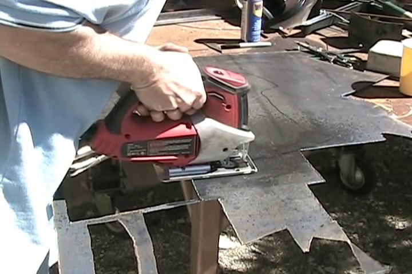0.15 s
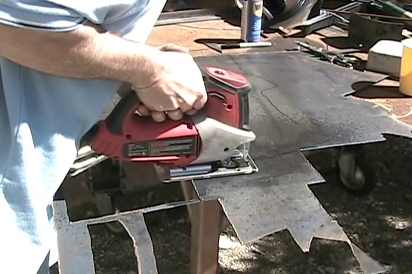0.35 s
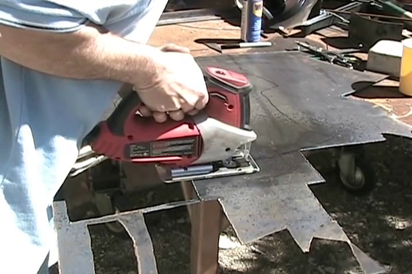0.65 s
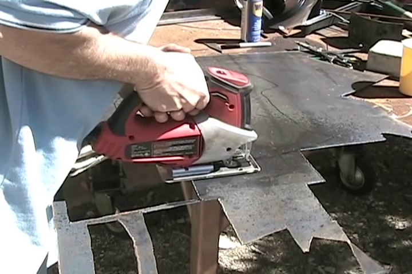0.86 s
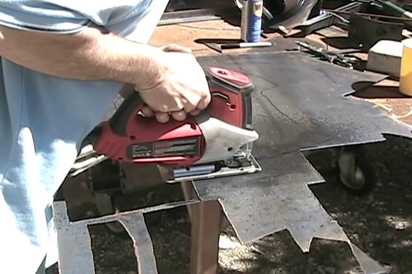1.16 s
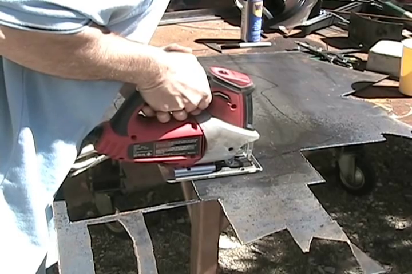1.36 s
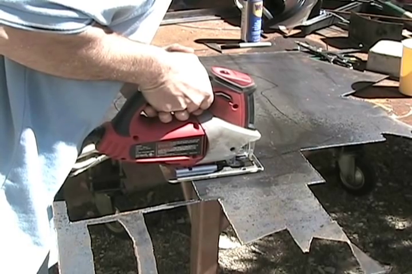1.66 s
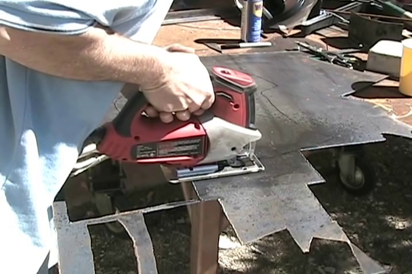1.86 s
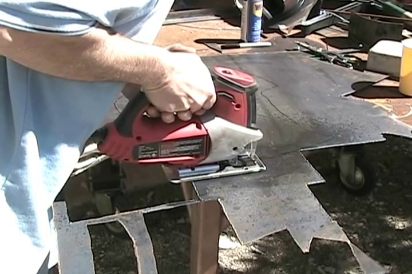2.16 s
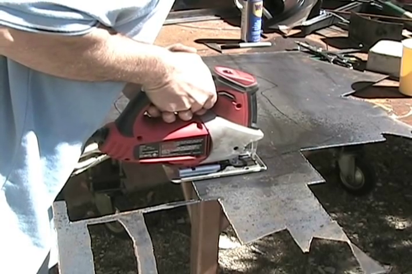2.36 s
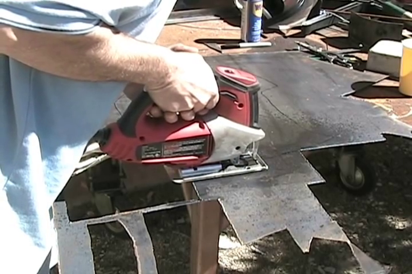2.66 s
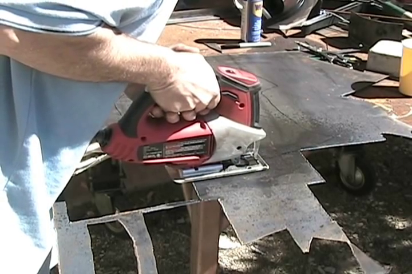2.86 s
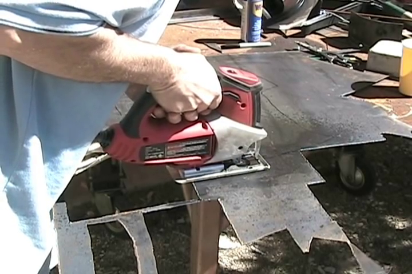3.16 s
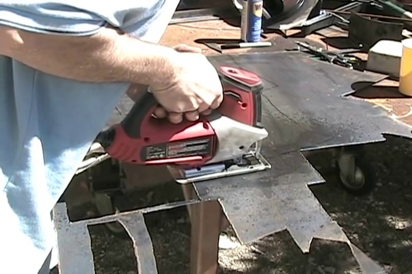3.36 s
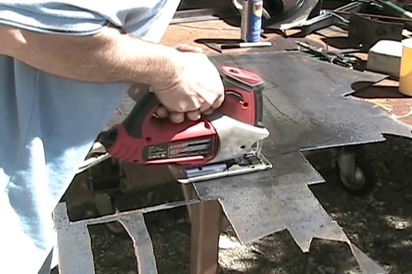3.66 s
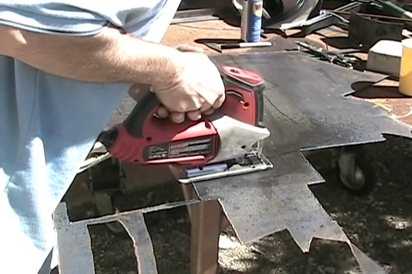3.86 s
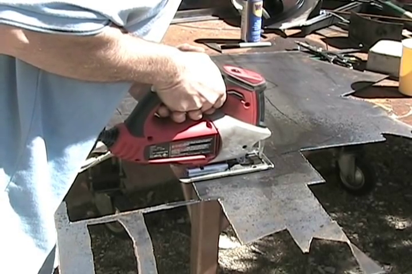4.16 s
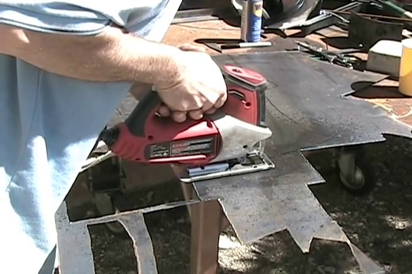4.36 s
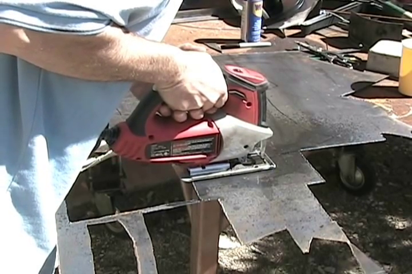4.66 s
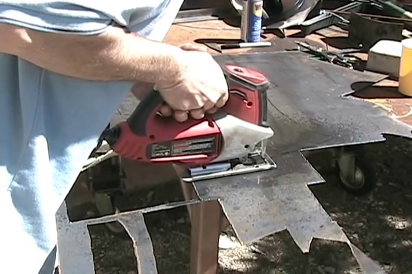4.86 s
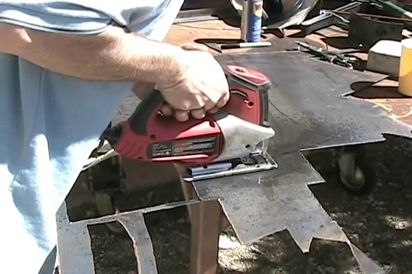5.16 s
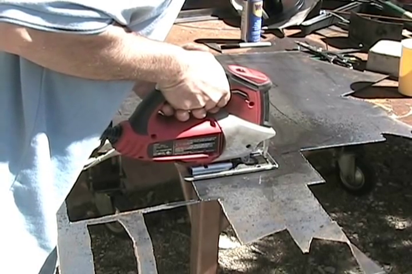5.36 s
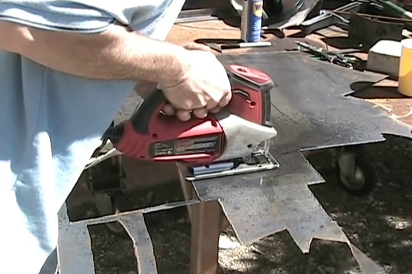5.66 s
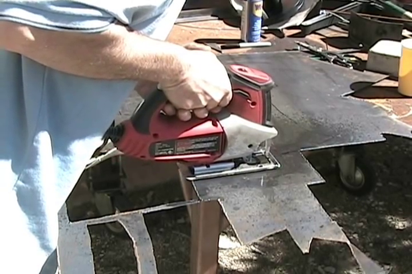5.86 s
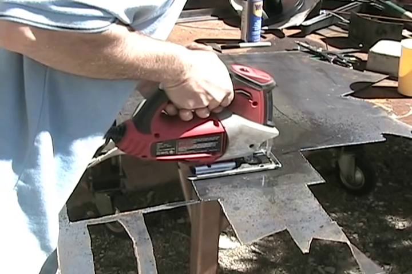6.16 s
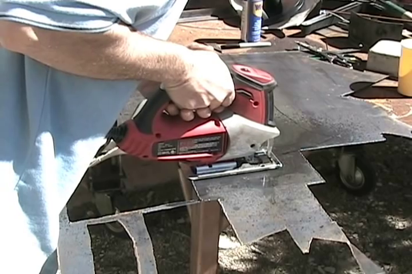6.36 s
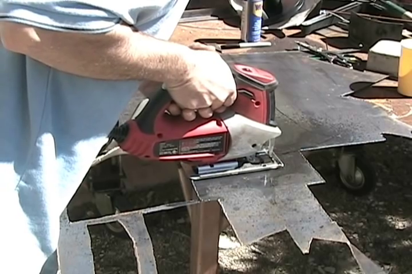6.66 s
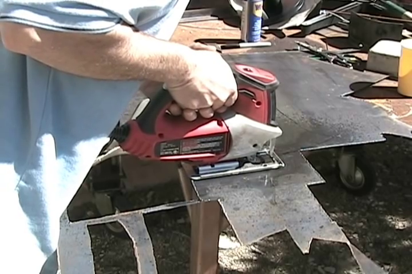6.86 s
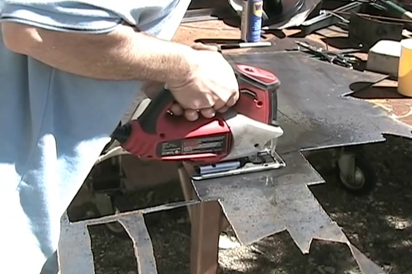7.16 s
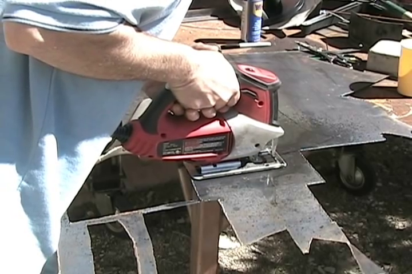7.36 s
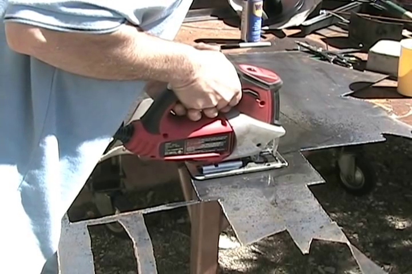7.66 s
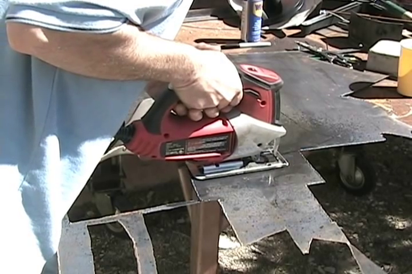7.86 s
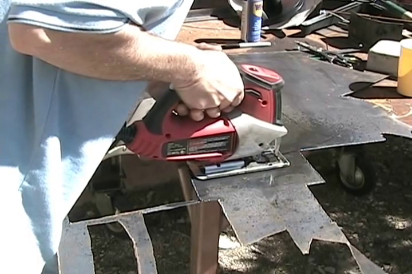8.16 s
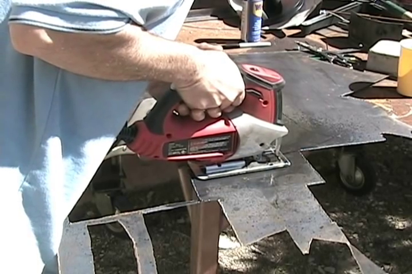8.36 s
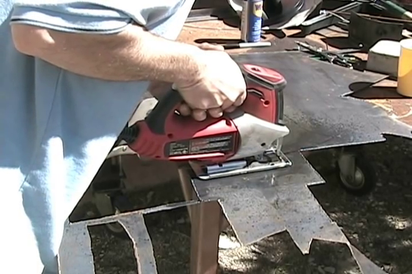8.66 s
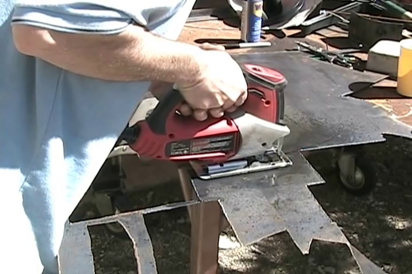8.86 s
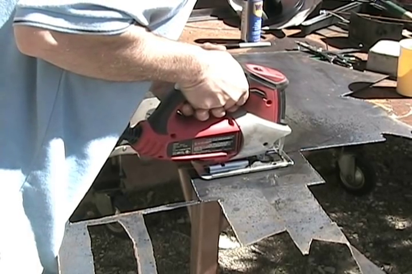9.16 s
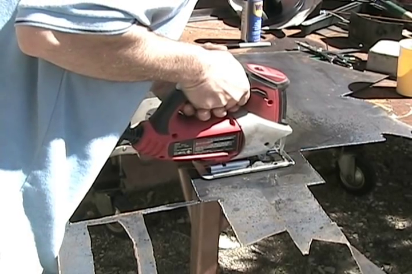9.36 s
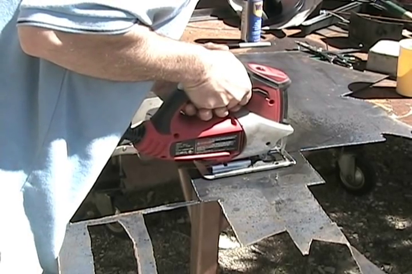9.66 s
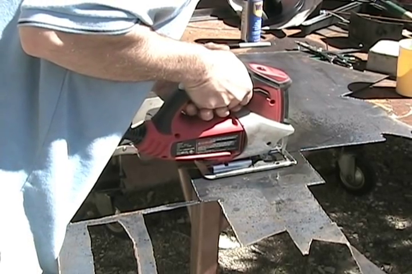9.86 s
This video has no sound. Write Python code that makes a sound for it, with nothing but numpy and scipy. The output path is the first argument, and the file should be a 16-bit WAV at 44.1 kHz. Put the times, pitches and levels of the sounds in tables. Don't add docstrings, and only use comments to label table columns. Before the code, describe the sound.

An electric jigsaw is already cutting thin sheet steel and never stops. Its teeth rasp in a rapid, roughly thirty-five-per-second flutter while the shoe rattles on the ringing sheet. A weak hum and low rumble lie underneath, with small irregular knocks where the blade grabs. Close, dry sound from a stereo camera microphone a metre or two away, mostly centred, its highest treble cut off.

```python
import sys
import numpy as np
from scipy import signal
from scipy.fft import rfft, irfft
from scipy.io import wavfile
from scipy.ndimage import uniform_filter1d

SR = 44100
rng = np.random.default_rng(int(sys.argv[2]) if len(sys.argv) > 2 else 0)


def voltage_ratio(level):
    return 10 ** (np.asarray(level, float) / 20)


def output_pcm(signal):
    pcm = np.clip(np.atleast_2d(signal).T, -1, 1) * 32767
    wavfile.write(sys.argv[1], SR, np.round(pcm).astype(np.int16))


N = 441000
T = np.arange(N) / SR
HZ = np.maximum(np.fft.rfftfreq(N, 1 / SR), 1)
SLOW = np.arange(N // 100 + 1) * 100 / SR


def unit(x):
    return x / np.sqrt(np.mean(x ** 2))


def shape(x, gain):
    return irfft(rfft(x) * gain, N)


def colour(points):
    hz, db = np.transpose(points)
    return voltage_ratio(np.interp(np.log(HZ), np.log(hz), db))


def under(hz, order=6):
    return 1 / np.sqrt(1 + (HZ / hz) ** (2 * order))


def gain_curve(db):
    return np.interp(T, SLOW, voltage_ratio(db))


def walk(rate):
    hold = int(SR / 100 / rate)
    held = np.repeat(rng.standard_normal(len(SLOW) // hold + 1), hold)
    slewed = uniform_filter1d(uniform_filter1d(held, hold), hold)
    return unit(slewed[:len(SLOW)])


def bell(t, at_s, length_s):
    return np.exp(-((t - at_s) / length_s) ** 2)


def burst(strokes, at, rise, fall, spread_db):
    turn = strokes - at + 2
    since = turn % 1
    stroke_db = spread_db * 2 * np.tanh(rng.standard_normal(size=400) / 2)
    strength = voltage_ratio(stroke_db)[turn.astype(int)]
    return strength * (1 - np.exp(-since / rise)) * np.exp(-since / fall)


def marks(bite_s, gain):
    out = np.zeros(N)
    out[np.clip((bite_s * SR).astype(int), 0, N - 1)] = gain
    return out


def grit(spread_db):
    clicks = rng.standard_normal((2, N))
    return unit(clicks * voltage_ratio(spread_db * rng.standard_normal((2, N))))


def clatter(strokes, count=12):
    length = SR // 35
    patterns = rng.standard_normal((count + 1, length))
    wobbly = strokes + 0.004 * np.interp(T, SLOW, walk(8))
    place = (wobbly % 1 * (length - 1)).astype(int)
    stage = T * count / (N / SR)
    old, blend = stage.astype(int), stage % 1 * np.pi / 2
    return np.cos(blend) * patterns[old, place] + np.sin(blend) * patterns[old + 1, place]


# (time [s], strokes done [count])
STROKE_COUNT = [(0.0, 0.09), (0.8, 26.9), (2.0, 67.76), (2.4, 81.46), (2.8, 95.29), (3.6, 122.82),
                (4.0, 136.48), (4.4, 150.37), (6.0, 206.23), (7.2, 248.19), (8.0, 276.28), (9.2, 318.69),
                (10.0, 346.7)]
# (time [s], thump level [dB])
GRABS = [(0.236, -33), (0.356, -41), (0.601, -40), (2.474, -41), (2.878, -39), (3.431, -36), (3.576, -43),
         (3.723, -39), (4.132, -31), (4.446, -40), (4.53, -41), (4.776, -38), (4.967, -34), (5.105, -29),
         (5.217, -39), (5.363, -38), (5.566, -38), (5.621, -33), (5.764, -35), (5.966, -34), (6.165, -35),
         (6.225, -35), (6.337, -36), (6.794, -36), (7.11, -32.5), (7.256, -36), (7.764, -37), (8.457, -39),
         (9.311, -37), (9.383, -37)]


def hard_bites():
    usual_db, spread_db, jitter_s = -49, 3, 0.002
    bind_s, bind_length_s, bind_db = 5.9, 1, 5
    grab_fade_db = 8
    felt_db = -47.5
    s, done = np.transpose(STROKE_COUNT)
    count = int(done[-1])
    chance = rng.standard_normal((count, 2)).T
    bite_s = np.interp(np.arange(count) + 1, done, s) + jitter_s * chance[0]
    bite_db = usual_db + bind_db * bell(bite_s, bind_s, bind_length_s) + spread_db * np.tanh(chance[1])
    for grab_s, grab_db in GRABS:
        k = np.argmin(abs(bite_s - grab_s))
        bite_s[k], bite_db[k] = grab_s, grab_db
        fading_db = grab_db - grab_fade_db * np.arange(1, len(bite_db) - k)
        bite_db[k + 1:] = np.maximum(bite_db[k + 1:], fading_db)
    felt = bite_db > felt_db
    sign = np.sign(chance[0] * chance[1])
    return bite_s[felt], bite_db[felt], sign[felt]


# (frequency [Hz], level [dB])
RASP_COLOUR = [(2600, -3), (4500, -1), (5900, 4), (7000, 3), (12000, 3.5)]


def scrape(strokes, bites):
    bite_s, bite_db, _ = bites
    tail = np.exp(-np.arange(SR // 20) / (0.007 * SR))
    crack = signal.fftconvolve(marks(bite_s, voltage_ratio(0.43 * (bite_db + 47))), tail)[:N]
    crack = np.roll(crack, -int(0.0026 * SR))
    up_stroke = 1.12 * burst(strokes, -0.11, 0.037, 0.23, 2.7)
    down_stroke = 0.3 * burst(strokes, 0.3, 0.05, 0.14, 3.0)
    force = up_stroke + down_stroke + 0.5 * crack
    rasp = shape(grit(1.5) * force * gain_curve(2.0 * np.tanh(walk(12))), colour(RASP_COLOUR))
    chatter = (grit(1.3) + 0.35 * clatter(strokes)) * gain_curve(0.61 * walk(14))
    airy = shape(chatter, 1 - under(6900.0))
    return chatter + airy * (gain_curve(1.06 * walk(10)) - 1) + rasp


def sheet(strokes):
    rattle = grit(0.87) + 0.59 * clatter(strokes)
    knock = 1 + 1.1 * burst(strokes, 0.26, 0.12, 0.15, 2.1) + 0.36 * burst(strokes, 0.79, 0.044, 0.08, 2.5)
    teeth = 1 + 0.4 * burst(strokes, -0.11, 0.1, 0.3, 2.5)
    dull = under(1850)
    knocked = shape(rattle * knock / np.mean(knock), dull)
    return knocked + shape(rattle * teeth / np.mean(teeth), 1 - dull)


# (frequency [Hz], width [Hz], then lift [dB] in
SHEET_MODES = [(377, 21, 1.5, 3, 0, 3), (409, 12, 4, -0.5, 5.5, 2.5), (445, 25, 0.5, 2.5, 2, 2),
               (634, 20, 1, 2.5, 2, 3), (768, 15, -1, 0.5, -3, 2), (801, 34, 4.5, 2, 3, 2),
               (832.6, 10, 3.5, 6, 5, 5), (1030.4, 45, 3.5, 3, 4.5, 3), (1065, 25, 2, 4, 1, 3),
               (1200, 23, 4, -4.5, -2.5, 6), (1253, 11, 4.5, 5.5, 5.5, 4), (1290, 20, 0.5, -0.5, 4, 2.5),
               (1363, 41, 1.5, 2.5, 2.5, 3.5), (1463, 25, -1, 4.5, 0.5, 3),
               (1531, 46, -0.5, 2.5, 4, 4.5), (1601, 12, 3, 3, -1, -1), (1690, 53, 0, 2.5, 0, -1),
              (1843, 10, 6, 4, 1.5, 2.5), (1954, 41, 2, 1.5, 0.5, -2), (2205, 32, 5, 2, 1.5, 2.5),
              (2317, 51, 3.5, 4.5, 1, 1), (2510, 93, 2.5, 3, 1.5, 3), (2850, 71, -1, 0.5, 1, 2.5),
              (3130, 62, 2.5, 3, 2, 3), (3950, 83, 2, -0.5, -1, 0.5), (5370, 77, 1, -2, -5, 0.5),
              (5870, 54, 0, 1.5, 2, 0.5)]
QUARTER_TIMES = [1.25, 3.75, 6.25, 8.75]


def ring(x):
    out = x.copy()
    for hz, width, *lift_db in SHEET_MODES:
        b, a = signal.iirpeak(hz, hz / width, SR)
        lift = gain_curve(1.69 * np.interp(SLOW, QUARTER_TIMES, lift_db) + 0.7 * walk(6)) - 1
        out += lift * signal.lfilter(b, a, x)
    return out


def thumps(bites):
    bite_s, bite_db, sign = bites
    hard = marks(bite_s, voltage_ratio(bite_db + 5.0) * sign)
    faint = voltage_ratio(-48.5) * rng.standard_normal(N) * (rng.random(N) < 150 / SR)
    decay = np.exp(-np.arange(SR // 20) / (0.0047 * SR))
    tail = signal.fftconvolve(abs(hard), decay)[:N]
    rough = 0.096 * tail * rng.standard_normal(N)
    push = signal.fftconvolve(hard + faint + rough, np.hanning(int(0.0017 * SR)), "same")
    return shape(push, np.sqrt(1 - under(45, order=1) ** 2))


# (multiple of the stroke rate, then level [dB] at each stage of the cut)
CRANK_HUM = [(3, -90, -74, -72, -69), (4, -74.5, -70.5, -68.5, -68), (5, -92, -70, -73, -69),
             (6, -72, -64, -63.5, -66.5), (7, -68, -65, -73, -65.5), (8, -69.5, -57, -61, -61),
             (9, -78, -77, -67, -68), (10, -66.5, -70, -72, -83), (11, -63, -63, -68, -57),
             (12, -69, -60, -82, -68), (13, -78, -67, -55.5, -64), (14, -69, -61.5, -66, -66),
             (18, -73, -74, -65, -60.5), (19, -73, -74, -64, -56)]
HUM_STAGES = [2.5, 3.1, 6.25, 8.75]


def crank(strokes):
    hum = 0
    for multiple, *stage_db in CRANK_HUM:
        gain = gain_curve(np.interp(SLOW, HUM_STAGES, stage_db) + 1.1 * walk(4))
        turns = int(round(multiple)) * strokes + rng.random()
        hum = hum + gain * np.sqrt(2) * np.sin(2 * np.pi * turns)
    return hum


def rumble(strokes):
    shake = 1 + 0.41 * burst(strokes, 0.086, 0.055, 0.3, 2.5)
    return (grit(1.0) + 0.2 * clatter(strokes)) * shake


# (time [s], feed [dB], length [s])
HAND_FEED = [(0.53, 1, .08), (0.664, -3.5, .025), (0.717, 2.5, .03), (0.8, -1.5, .04), (1.15, 2.5, 0.029),
             (1.22, -2, .06), (1.427, 1, 0.038), (1.95, -1, 0.14), (2.17, 0.5, 0.045), (2.664, -2, .04),
             (3.155, -3.5, 0.044), (3.25, 1.5, .05), (3.395, -3.5, .03), (3.43, 2.5, .04),
             (4.083, -1.5, .06), (4.264, -2, 0.024), (4.477, -1.5, .04), (4.537, 1.5, .03),
             (4.62, -2, 0.034), (5.39, 1, .03), (5.967, 2, 0.025), (6.034, -2.5, 0.061), (6.203, 2, 0.043),
             (6.3, -1, 0.044), (6.91, -2, 0.07), (7.137, 3, 0.025), (8.225, 2.5, .04), (9.17, -2.5, 0.028),
             (9.378, 2, 0.068), (9.44, -2, 0.043)]


def levels():
    feed_db = sum(db * bell(SLOW, s, length) for s, db, length in HAND_FEED)
    sheet_db = -30.5 + 0.078 * SLOW + feed_db + 0.38 * walk(10)
    scrape_db = -29 - 0.11 * SLOW + 0.51 * feed_db + 0.07 * walk(10)
    rumble_db = -51 + 0.28 * SLOW + 2 * walk(16)
    return sheet_db, scrape_db, rumble_db


def patchy(side, patchy_db=3.5):
    out, common, below = 0, walk(11), 0
    for hz in [900, 1200, 1600, 2100, 2800, 3600, 4600, 5800]:
        upto = (HZ < hz) * 1.0
        swing = 0 if hz == 900 else patchy_db
        out = out + gain_curve(swing * (0.67 * common + 0.63 * walk(12))) * shape(side, upto - below)
        below = upto
    return out + shape(side, 1 - below)


# (frequency [Hz], level [dB])
BODY_COLOUR = [(25, -58), (60, -47), (200, -28), (310, -22), (385, -18.5), (580, -15.5), (800, -10),
               (910, -12), (1040, -3), (1300, -3.5), (1700, -5.5), (2000, -6), (2400, -6.5), (2700, -8)]
# (frequency [Hz], level [dB])
SCRAPE_COLOUR = [(2400, -8), (2750, -9.5), (3400, -9.5), (4300, -9), (5000, -11), (5800, -9.5),
                 (6400, -12.5), (7000, -16.5), (7800, -21.5), (8800, -17.5), (10000, -21.5), (10800, -27.5),
                 (12500, -34.5), (13600, -42), (14300, -53)]
# (frequency [Hz], level [dB])
STEREO_WIDTH = [(500, -10), (800, -19), (1250, -22), (2200, -18.5), (3400, -22.5), (5000, -23.5),
                (6200, -18.5), (7500, -8.5), (9000, -11), (11000, -2.5), (12000, -6), (12800, -4),
                (13200, -30)]


def scene():
    strokes = np.interp(T, *np.transpose(STROKE_COUNT))
    bites = hard_bites()
    sheet_db, scrape_db, rumble_db = levels()
    side_gain = colour(STEREO_WIDTH) * np.sqrt(1 - under(500, order=2) ** 2)
    width = np.array([np.ones_like(HZ), side_gain])
    low, below_scrape = under(700), under(2600)
    sheet_band = colour(BODY_COLOUR) * np.sqrt(1 - low ** 2) * below_scrape
    scrape_band = colour(SCRAPE_COLOUR) * np.sqrt(1 - below_scrape ** 2)
    parts = [(scrape(strokes, bites), scrape_band, scrape_db),
             (sheet(strokes), sheet_band, sheet_db),
             (rumble(strokes), colour(BODY_COLOUR) * low, rumble_db)]
    cut = 0
    for source, band, db in parts:
        sound = shape(source, width * band)
        cut = cut + gain_curve(db) * sound / np.std(sound[0])
    mid, side = ring(cut)
    lean = shape(mid, 0.26 * np.exp(-np.log(HZ / 8000) ** 2 / 0.011))
    thump = thumps(bites)
    mid = mid + crank(strokes) + shape(thump, 0.09 * 1j)
    side = patchy(side) + thump - lean
    return np.array([mid + side, mid - side])


def band_limit(x):
    return signal.sosfilt(signal.butter(12, 14350, fs=SR, output="sos"), x)


def record(dry):
    ceiling, drum_hz = 0.58, 299.06
    rounded = ceiling * np.tanh(dry / ceiling)
    lap = np.exp(-2j * np.pi * np.fft.rfftfreq(N, 1 / SR) / drum_hz)
    depth, width = 0.93, 0.6
    comb = (1 - depth * lap) / (1 - width * lap) * (1 + width) / (1 + depth)
    mix = shape(rounded, comb)
    return band_limit(mix)


dry = scene()
out = record(dry)
output_pcm(out)
```